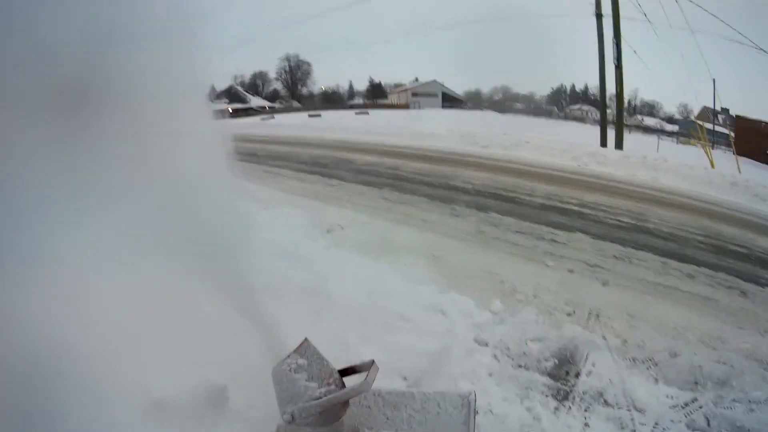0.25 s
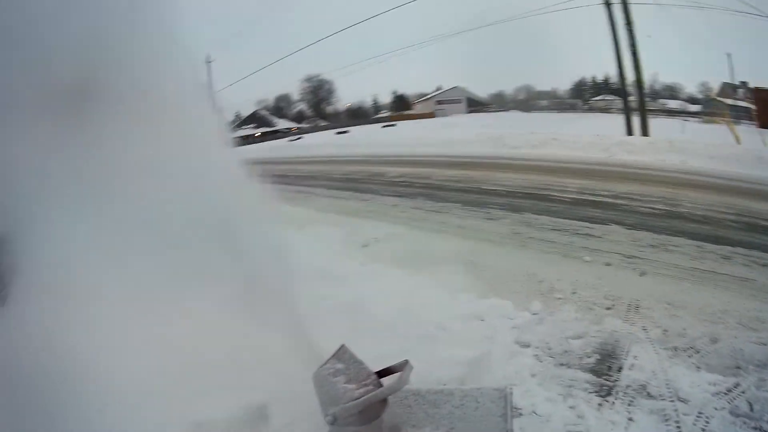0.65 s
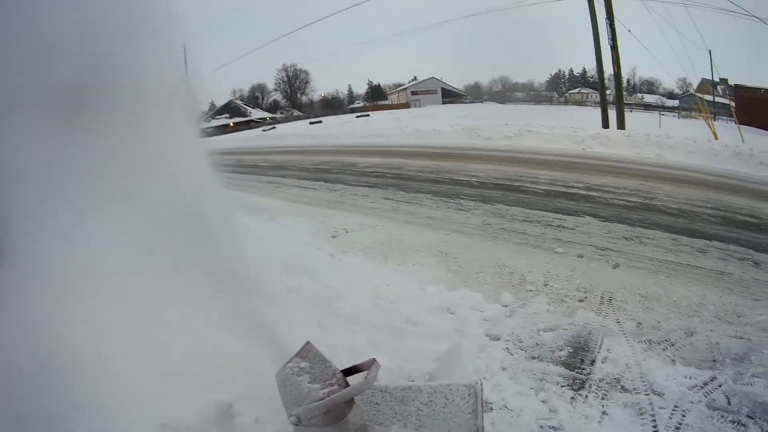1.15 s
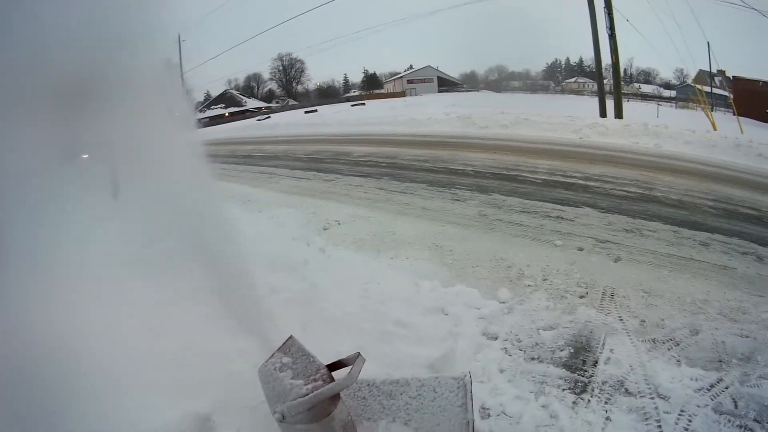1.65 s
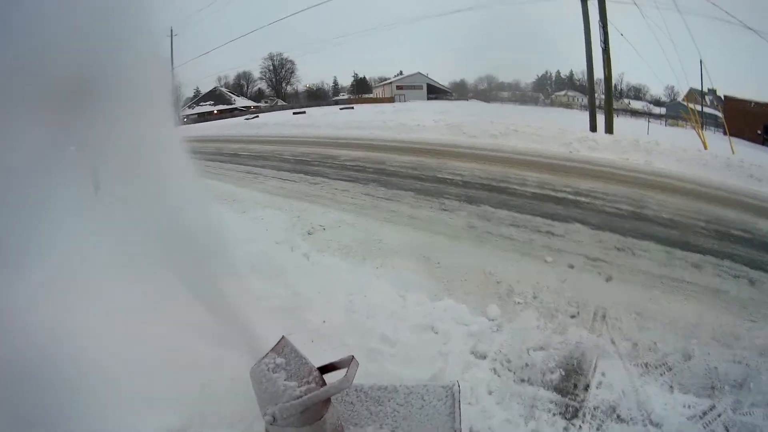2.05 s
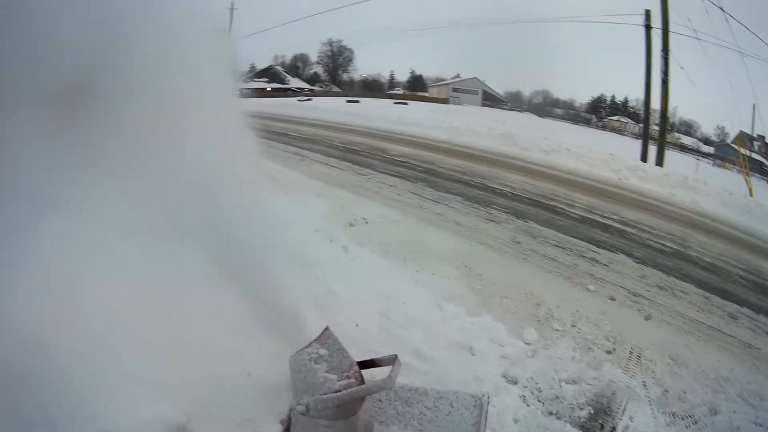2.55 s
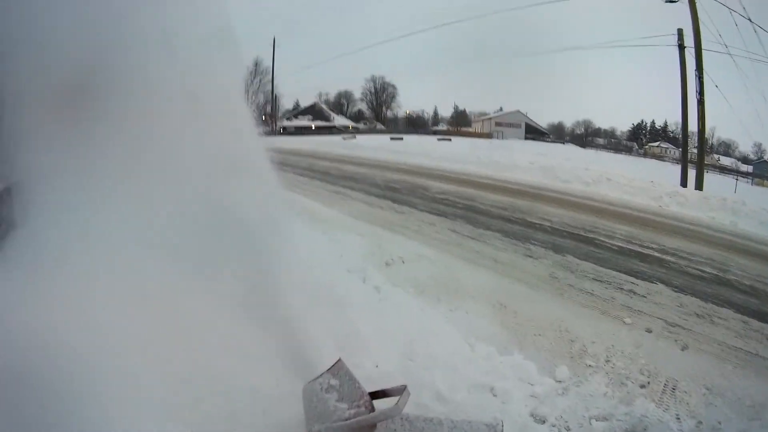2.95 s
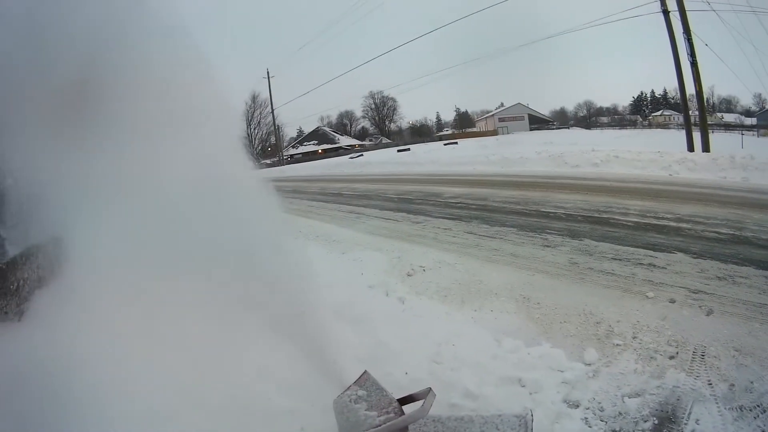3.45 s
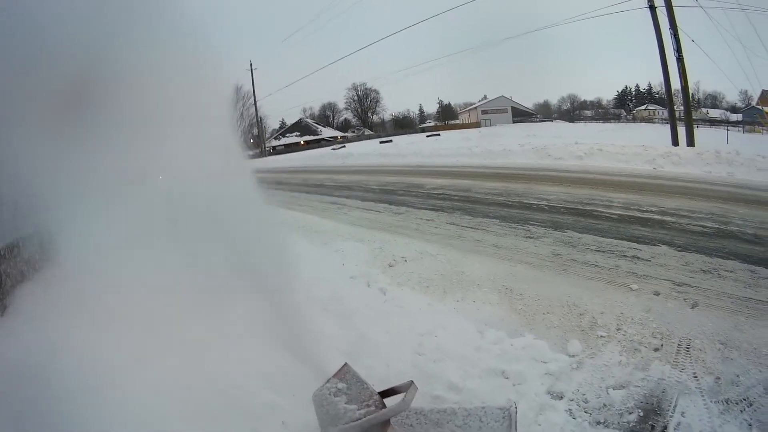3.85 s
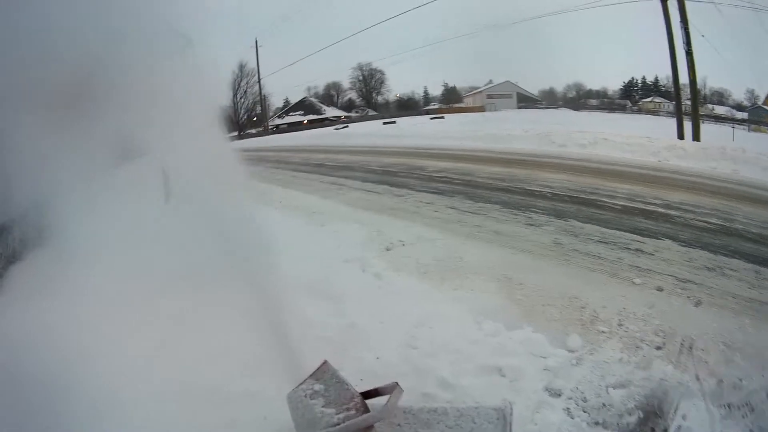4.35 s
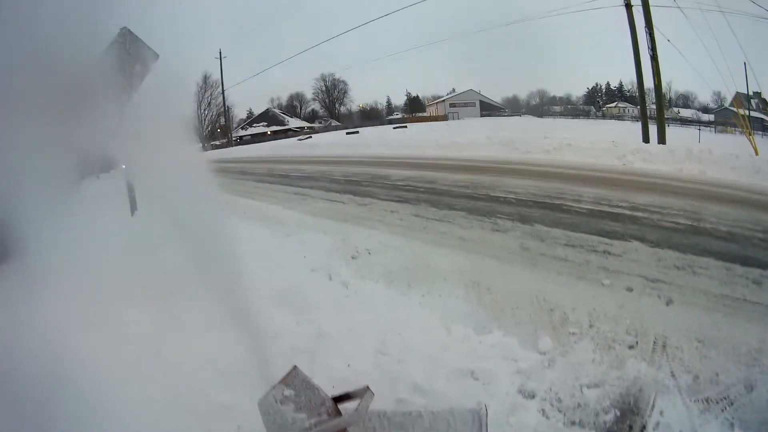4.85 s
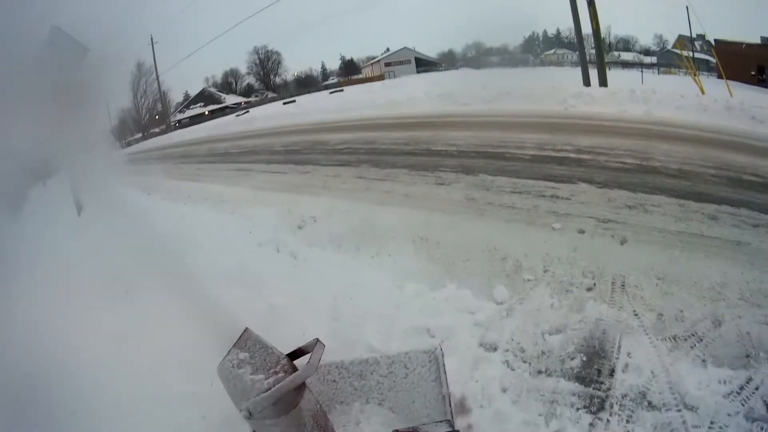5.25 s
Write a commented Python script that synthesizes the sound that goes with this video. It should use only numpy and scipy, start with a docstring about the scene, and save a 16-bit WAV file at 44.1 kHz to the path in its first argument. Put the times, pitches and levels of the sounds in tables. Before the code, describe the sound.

Close, rapid engine thumping from a walk-behind snowblower, bogging down once under heavy snow and picking up again over churning augers and spray.

```python
"""A single-cylinder four-stroke snowblower chews through a snow bank, close up, microphone at its handlebar.
Deep snow loads it: the speed sags, the rasp on each thump grows, the intake gulps and the impeller belt slips.
Pulses, resonances and shaped noise follow the engine cycle: exhaust thumps, and valve gear knocking on steel.
Augers roar and snow hisses out of the chute; one charge burns late, a brief stumble."""
import sys
import numpy as np
from scipy import signal
from scipy.fft import rfft, irfft
from scipy.io import wavfile

SR = 44100
rng = np.random.default_rng(int(sys.argv[2]) if len(sys.argv) > 2 else 0)


def master_out(mix):
    """Clip the mix to full scale and print it as 16-bit PCM to the path in sys.argv[1]."""
    frames = np.transpose(np.atleast_2d(mix))
    ceiling = np.clip(frames, -1, 1)
    pcm = np.round(ceiling * 32767).astype(np.int16)
    wavfile.write(sys.argv[1], SR, pcm)


N = 242991

# engine speed: (time [s], firing rate [1/s])
SPEED = [(0, 27.43), (.436, 27.065), (.852, 27.945), (1.579, 28.74), (2.088, 27.175), (2.405, 26.62),
         (2.743, 25.5), (3.025, 25.48), (3.543, 27.69), (3.924, 28.47), (5.171, 29.55), (5.51, 28.55)]
FIRST_TURN = .19  # place in the engine cycle at the start, 0-1
LATE_BURN_S = 4.015
# the engine runs free at FREE_HZ firings per second; a full load of snow drags it down by DROOP_HZ
FREE_HZ, DROOP_HZ = 29.336, 2.35
# snow packs the augers at once, but they clear at most this share of a full load per second
CLEAR_PER_S = 0.93


def gain_of(db):
    """Decibels to amplitude."""
    return 10 ** (np.asarray(db) / 20)


def evened(x):
    """Scales to rms 1."""
    return x / np.sqrt(np.mean(x ** 2) + 1e-20)


def follow(curve):
    """A control curve at every sample."""
    return np.interp(np.arange(N) / SR, *np.transpose(curve))


def response(points, size=4096):
    """Causal (minimum-phase) impulse response with the given spectrum, peak 1."""
    hz, db = np.transpose(points)
    bins_hz = abs(np.fft.fftfreq(size, 1 / SR))
    log_gain = np.log(gain_of(np.interp(np.log(bins_hz + 1), np.log(hz), db)))
    spectrum = np.exp(np.conj(signal.hilbert(log_gain)))
    taps = np.fft.ifft(spectrum).real[:size // 2]
    return taps / abs(taps).max()


def pulse(points, lean, size=4096):
    """A rounded pressure dip with the given spectrum, centred; lean [rad] makes its front steeper than its back."""
    hz, db = np.transpose(points)
    bins_hz = np.fft.rfftfreq(size, 1 / SR)
    gain = gain_of(np.interp(np.log(bins_hz + 1), np.log(hz), db))
    gain[0] = 0  # no steady pressure
    shape = np.roll(irfft(gain * np.exp(-1j * lean), size), size // 2)
    return -shape / shape.max()


def ring(x, taps):
    """Passes x through an impulse response."""
    return signal.oaconvolve(x, taps)[:N]


def noise(points, envelope):
    """Random noise of the given strength, coloured by a spectrum."""
    taps = response(points)
    return ring(envelope * rng.standard_normal(N), taps / np.linalg.norm(taps))


def wander(hz):
    """Slow chance of rms 1, up to the given rate."""
    spectrum = rfft(rng.standard_normal(N))
    return evened(irfft(spectrum * (np.fft.rfftfreq(N, 1 / SR) < hz), N))


def strokes(cycle, place, spread_db, jitter_s):
    """One click per engine cycle at the given place, each a little off in size and time."""
    at = np.flatnonzero(np.diff(np.floor(cycle - place)) > 0)
    size, slip = rng.standard_normal((len(at), 2)).T
    shifted = at + np.round(slip * jitter_s * SR).astype(int)
    clicks = np.zeros(N)
    clicks[np.clip(shifted, 0, N - 1)] = gain_of(spread_db * size)
    return clicks


def window(cycle, place, width):
    """A bell that opens once per cycle; place and width in cycles."""
    distance = (cycle - place + .5) % 1 - .5
    return np.exp(-.5 * (distance / width) ** 2)


def snow_load():
    """Load 0-1: the more snow the augers take, the further the speed sags below its free run; it clears gradually."""
    sag = np.clip((FREE_HZ - follow(SPEED)) / DROOP_HZ, 0, 1)
    cleared = CLEAR_PER_S * np.arange(N) / SR
    return np.maximum.accumulate(sag + cleared) - cleared


def throttle():
    """Opening 0-1: the governor opens it as the speed sags."""
    return np.clip((28 - follow(SPEED)) / 2.4, 0, 1)


def late_burn():
    """True for the short while in which the late charge leaves."""
    return abs(np.arange(N) / SR - LATE_BURN_S) < .012


def exhaust(cycle, load):
    """Each blowdown sends a sharp front, then a thump through the muffler that deepens with load."""
    # muffler thump on a light load: (frequency [Hz], relative level [dB])
    light_spectrum = [(18, -18), (28, -13.5), (57, -7.5), (90, -16.5), (115, -6), (145, -10.5), (178, 3.5),
                      (205, 2.5), (232, -5), (265, -1.5), (320, -9), (420, -16.5), (650, -33), (2000, -84)]
    # muffler thump on a full load: (frequency [Hz], relative level [dB])
    full_spectrum = [(18, -12), (27, -8), (53, -1), (80, -5.5), (108, -3.5), (135, 0.5), (165, 3.5),
                     (195, 3.5), (225, 1.5), (270, -14), (360, -32), (450, -42), (650, -43), (2000, -69)]
    # sharp front of each blowdown: (frequency [Hz], relative level [dB])
    front_spectrum = [(100, -7), (250, -25), (420, -1), (640, -2.5), (850, -19), (1200, -10.5),
                      (1700, -21.5), (2600, -55)]
    late = late_burn()
    blows = strokes(cycle, place=-0.0064, spread_db=-0.16, jitter_s=.0001)
    # the late charge leaves as two weaker puffs
    second_puff = .85 * np.roll(blows * late, round(.0066 * SR))
    blows = blows * (1 - .35 * late) + second_puff
    light = signal.oaconvolve(blows * (1 - load), pulse(light_spectrum, lean=0.71), "same")
    full = signal.oaconvolve(blows * load, pulse(full_spectrum, lean=0.43), "same")
    fronts = strokes(cycle, place=-.054, spread_db=1.5, jitter_s=.00008)
    # turned over, so the front is a pressure rise
    front = -signal.oaconvolve(fronts, pulse(front_spectrum, lean=0), "same")
    return gain_of(-4.5) * (light + full) + front * gain_of(-16.0 + 3.2 * load)


def bright_rasp(cycle, load):
    """A bright rasp a few milliseconds long comes with each exhaust thump, louder under load: bursts of noise."""
    # bright rasp: (frequency [Hz], relative level [dB])
    rasp_spectrum = [(1200, 11.5), (2600, -6), (3600, 4), (5400, 2), (6500, -11.5), (7200, -1.5), (8400, 4),
                     (9100, -12), (9800, -10), (11000, -24.5), (12500, -5.5), (13400, -23), (14500, -16)]
    # extra hiss in the rasp at wide throttle: (frequency [Hz], relative level [dB])
    hiss_spectrum = [(1500, -2), (3000, -18), (4600, 4), (5500, 7), (6300, -19), (7500, -9), (9800, -19.5),
                     (12500, -19), (14500, -22)]
    age = np.arange(SR // 60) / SR / .00125  # in units of the 1.25 ms rise
    starts = strokes(cycle, place=-.045, spread_db=.8, jitter_s=.0001)
    # the late charge leaves with little rasp
    bursts = ring(starts, age * np.exp(1 - age)) * (1 - .8 * late_burn())
    rasp = noise(rasp_spectrum, bursts * gain_of(-35.0 + 11.8 * load))
    hiss = noise(hiss_spectrum, bursts * throttle() * gain_of(-31.5))
    return rasp + hiss


def intake(cycle, load):
    """The carburettor gulps once a cycle, earlier and louder as the throttle opens."""
    # gulp: (frequency [Hz], relative level [dB])
    gulp_spectrum = [(60, -50), (150, -31), (210, -5), (285, 3.5), (365, 5.5), (440, -2), (520, -4.5),
                     (640, -17), (900, -38), (2500, -68)]
    gulps = strokes(cycle + .019 * throttle(), place=.652, spread_db=.8, jitter_s=.00006)
    more_db = 7 * throttle() ** 2
    return signal.oaconvolve(gulps * gain_of(-15 + more_db), pulse(gulp_spectrum, lean=0.038), "same")


def drone(cycle, load):
    """Harmonics of the firing rate swell as the speed carries them through narrow resonances."""
    # airbox and silencer resonances:
    # (frequency [Hz], width [Hz], light-load level [dB], full-load level [dB])
    resonances = [(273.7, 16, -22.5, -59), (286.8, 27, -36, -27.5), (359.4, 11.7, -40, -22),
                  (418.4, 54, -27, -37.5), (617, 41, -35, -35), (655.3, 27, -58, -28), (699, 20, -28, -70)]
    speed, hum = follow(SPEED), np.zeros(N)
    for hz, width, light_db, full_db in resonances:
        strength = gain_of(light_db + (full_db - light_db) * load + 0.71 * wander(hz=3.7))
        # every harmonic that the changing speed brings near this resonance
        for k in range(int(hz / speed.max()), int(hz / speed.min()) + 2):
            detuning = 2 * (k * speed - hz) / width
            hum -= strength * np.cos(2 * np.pi * k * cycle) / (1 + detuning ** 2)
    return hum


def valve_gear(cycle, load):
    """Tappets and piston rap on the steel housing, which rings in decaying modes; each rap has a short tick."""
    # knocks of one cycle: (place in the cycle [0-1], relative housing level [dB], relative tick level [dB])
    knock_places = [(0.19, -21, -36.5), (.36, -22.5, -40), (0.535, -25, -30), (.66, -19, -42),
                    (0.791, -24, -36)]
    # modes of the steel housing: (frequency [Hz], relative level [dB], decay time t60 [s])
    housing_modes = [(419.3, 7.5, 0.023), (594, 0.5, 0.027), (680, 1, 0.031), (896.6, -5.5, 0.065),
                     (1230, -7.5, 0.074), (1597, -6.5, 0.023), (1855, -15, 0.026)]
    # bright tick: (frequency [Hz], relative level [dB])
    tick_spectrum = [(1500, -16), (3500, 3.5), (5600, 5), (6500, -6.5), (8200, -4), (9300, -22),
                     (11000, -10), (12600, -6), (14500, -21)]
    t = np.arange(SR // 8) / SR
    # the blow takes a moment to spread through the sheet metal
    onset = 1 - np.exp(-t / .001)
    tick_shape = np.exp(-t / .003) - np.exp(-t / .0006)
    body, ticks = np.zeros(N), np.zeros(N)
    for place, body_db, tick_db in knock_places:
        knocks = strokes(cycle, place, spread_db=2, jitter_s=.00011)
        modes = np.zeros(len(t))
        for hz, db, t60 in housing_modes:
            modes += gain_of(db - 60 * t / t60) * np.sin(2 * np.pi * (hz * t + rng.random()))
        body += gain_of(body_db) * ring(knocks, onset * modes)
        ticks += gain_of(tick_db) * ring(knocks, tick_shape)
    return body * gain_of(-3.0 + 1 * load) + noise(tick_spectrum, ticks * gain_of(-8 + 1.4 * load))


def impeller(cycle, load):
    """The blades hum just under twice the firing rate; snow slips the belt and loads the blades."""
    turn = 2 * np.pi * np.cumsum(follow(SPEED) * (1.905 - .05 * load)) / SR
    # (multiple of the hum, unloaded level [dB], rise at full load [dB])
    blades = [(1, -47.0, 16.3), (2, -36.0, 6.8), (3, -36, 1.2), (4, -51.0, 1), (5, -39.5, 1.5)]
    hum = np.zeros(N)
    for multiple, db, more_db in blades:
        strength = gain_of(db + more_db * load + wander(hz=6.1)) * np.sqrt(2)  # rms to peak
        hum += strength * np.cos(multiple * turn + rng.uniform(0, 2 * np.pi))
    return hum


def augers(cycle, load):
    """Augers churn the snow into a broad roar that throbs once per engine cycle."""
    # roar: (frequency [Hz], relative level [dB])
    roar_spectrum = [(20, -16), (45, -16.5), (100, -5), (200, -5), (300, -3.5), (420, -2.5), (520, -3.5),
                     (700, -2), (900, -3.5), (1050, -7), (1270, -6.5), (1450, -15), (1750, -16),
                     (2100, -33), (2700, -55.5), (5000, -81.5)]
    throb = 1 + .5 * window(cycle, place=-0.076, width=0.1)
    flutter_db = .9 * wander(hz=40)
    return noise(roar_spectrum, throb * gain_of(-24.0 + 2 * load + flutter_db))


def chute(cycle, load):
    """Snow rumbles in the chute and sprays out: two unsteady noises that grow with load."""
    # rumble: (frequency [Hz], relative level [dB])
    rumble_spectrum = [(25, -38), (50, -8), (85, -7), (140, -9.5), (300, -13.5), (520, -13), (850, -5),
                       (1200, -14), (3000, -57)]
    # spray: (frequency [Hz], relative level [dB])
    spray_spectrum = [(1350, -29), (2300, -2.5), (2750, -10.5), (3430, 1.5), (3710, 2.5), (5570, -6.5),
                      (6550, -18.5), (8070, -10.5), (8510, -12), (9120, -41), (9850, -21), (10600, -31),
                      (12700, -25.5), (13500, -26), (14500, -58)]
    rumble = noise(rumble_spectrum, gain_of(-35.0 + 4.4 * load + 2.3 * wander(hz=9.2)))
    unsteady_db = 1 * wander(hz=58.0) + 0.47 * wander(hz=8.7)
    spray = noise(spray_spectrum, gain_of(-46.0 + 0.68 * load + unsteady_db))
    return rumble + spray


def flywheel_fan(cycle, load):
    """The fan's air rush weakens as the throttle opens at low speed and as the load grows."""
    # rush: (frequency [Hz], relative level [dB])
    rush_spectrum = [(200, -29.5), (330, -4.5), (460, 1), (620, -8), (1000, -20), (1300, -9), (1650, -11.5),
                     (1900, -15), (2200, -35.5), (3000, -49.5), (5000, -47)]
    return noise(rush_spectrum, gain_of(-29.0 - 8.2 * throttle() - 11.3 * load))


def scene():
    """The engine cycle and the load drive every part."""
    cycle = FIRST_TURN + np.cumsum(follow(SPEED)) / SR
    load = snow_load()
    parts = (exhaust, bright_rasp, intake, drone, valve_gear, impeller, augers, chute, flywheel_fan)
    return sum(part(cycle, load) for part in parts)[None]


def record(dry):
    """Full-scale limit, then the band limit."""
    edge = signal.firwin(255, 14500, window=("kaiser", 8), fs=SR)
    return signal.oaconvolve(np.clip(dry, -1, 1), edge[None], "same")


dry = scene()
out = record(dry)
master_out(out)
```